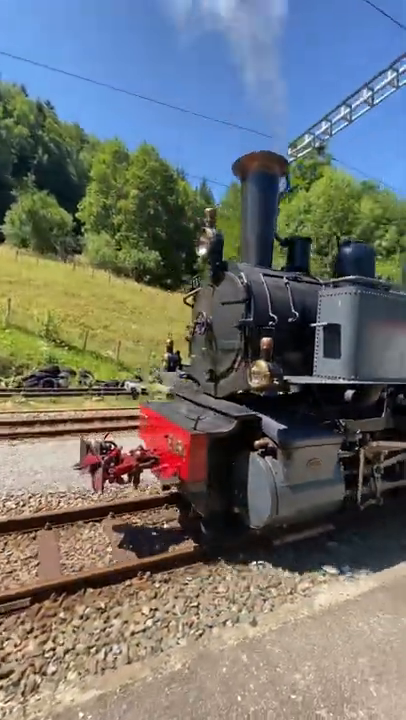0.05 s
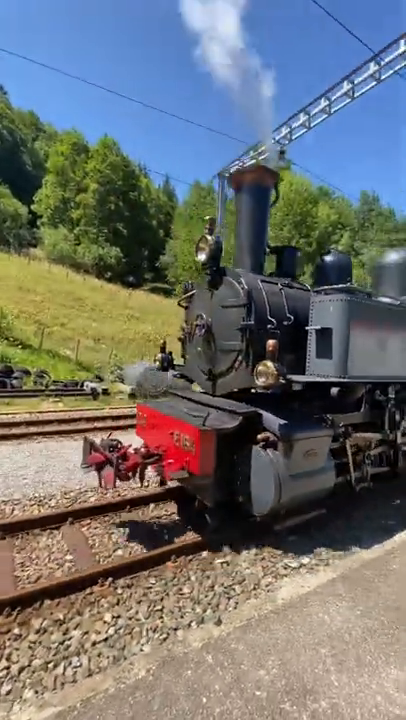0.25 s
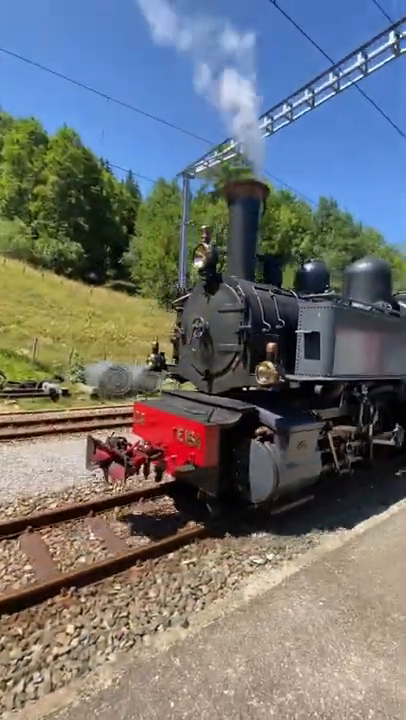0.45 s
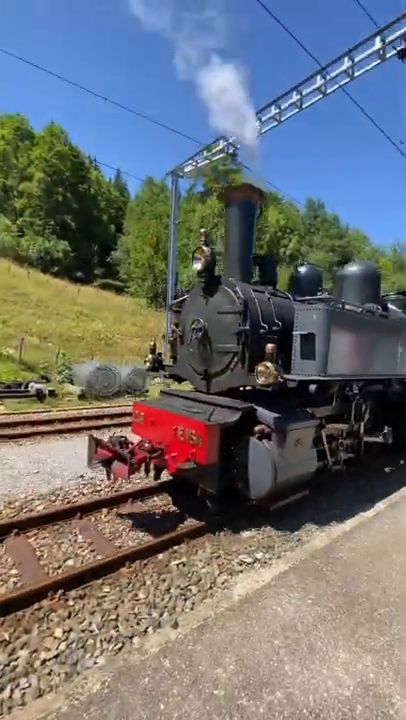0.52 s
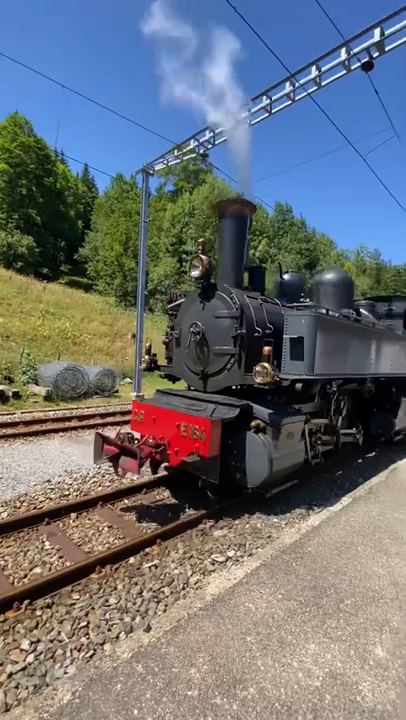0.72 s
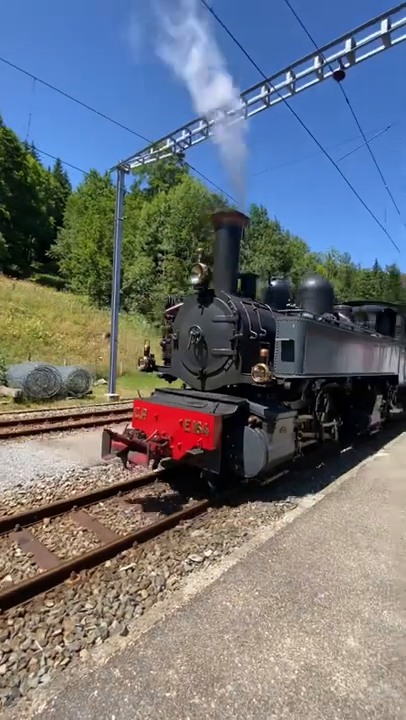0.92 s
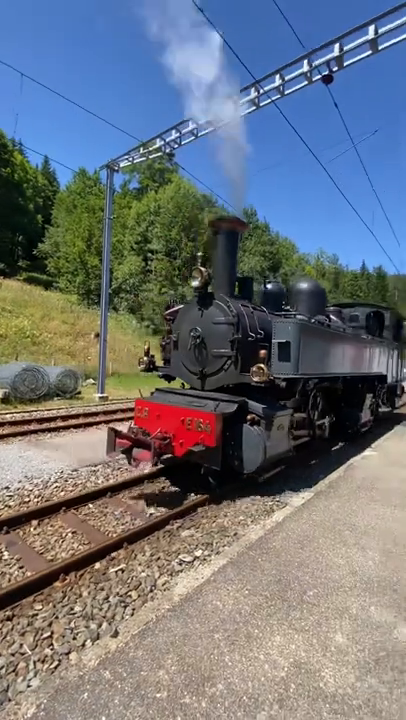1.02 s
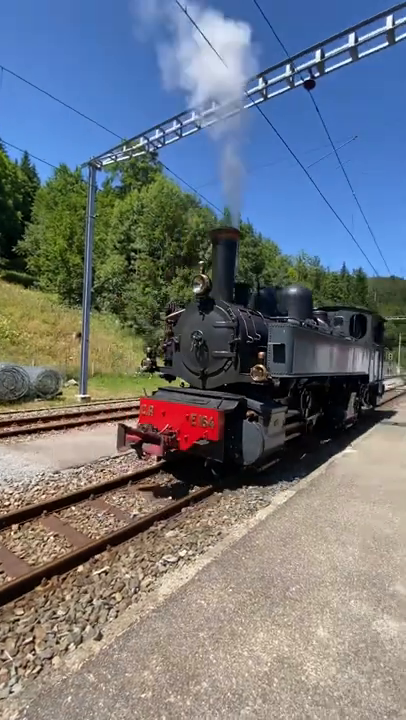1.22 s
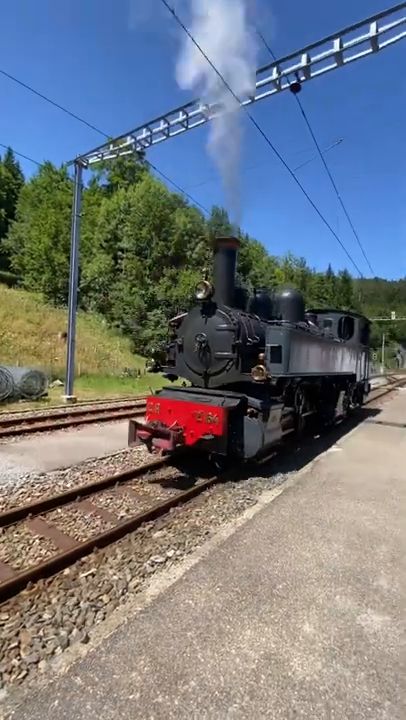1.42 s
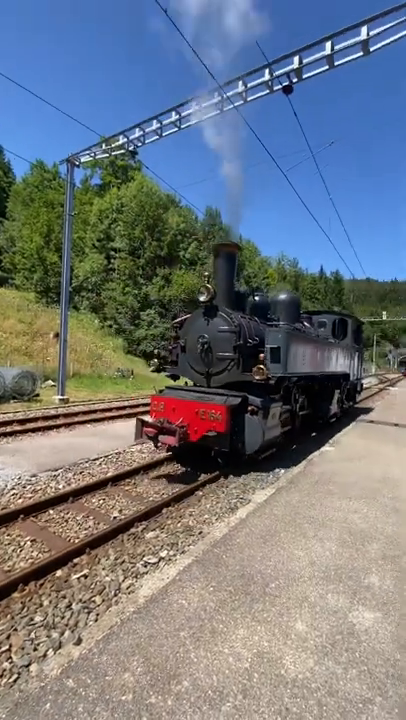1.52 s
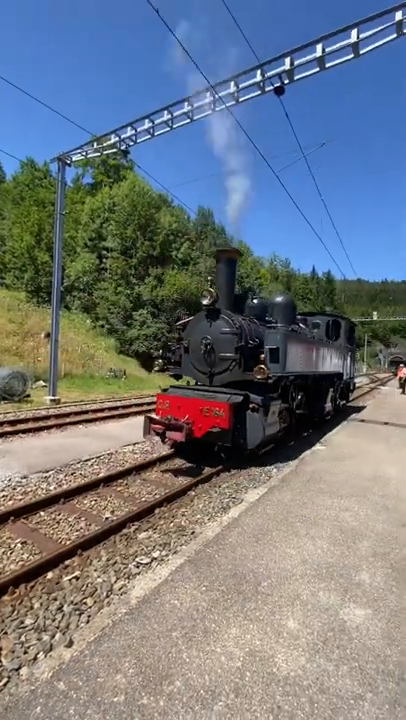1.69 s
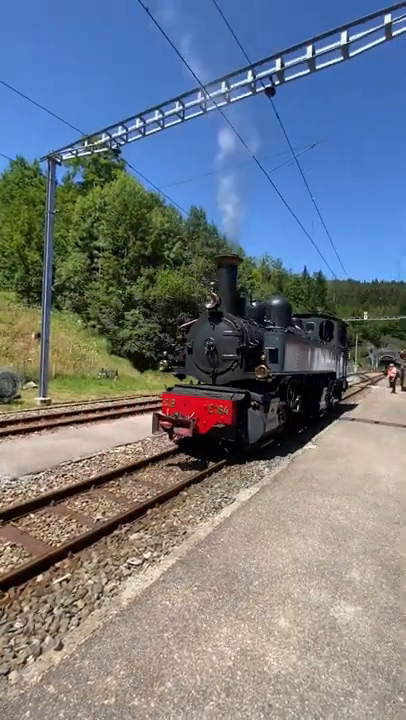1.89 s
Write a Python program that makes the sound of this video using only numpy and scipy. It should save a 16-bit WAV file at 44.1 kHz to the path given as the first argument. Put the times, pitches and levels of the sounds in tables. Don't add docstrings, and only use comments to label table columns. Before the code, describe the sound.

Steam locomotive hissing steadily with a wavering whistle-like ring, then a sharp double puff of steam

```python
import sys
import numpy as np
from scipy import signal
from scipy.fft import rfft, irfft, next_fast_len
from scipy.io import wavfile
from scipy.ndimage import uniform_filter1d

SR = 44100
rng = np.random.default_rng(int(sys.argv[2]) if len(sys.argv) > 2 else 0)


def field_ratio(decibels):
    return 10 ** (np.asarray(decibels, dtype=float) / 20)


def generate_wav(sig):
    pcm = np.round(np.clip(np.atleast_2d(sig).T, -1, 1) * 32767).astype(np.int16)
    wavfile.write(sys.argv[1], SR, pcm)


N = 85995
T = np.arange(N) / SR


def evened(x):
    return x / np.sqrt(np.mean(x ** 2) + 1e-20)


def read(points, hz):
    f, value = np.transpose(points)
    return np.interp(np.log(hz + 1), np.log(f + 1), value)


def follow(rows, column):
    rows = np.array(rows)
    return np.interp(T, rows[:, 0], rows[:, column])


def drift(size):
    once = uniform_filter1d(rng.standard_normal(N), size)
    return evened(uniform_filter1d(once, size))


def bump(centre_s, length_s):
    return np.cos(np.pi / 2 * np.clip((T - centre_s) / length_s, -1, 1)) ** 2


def resonate(x, hz, width_hz):
    turn = np.exp(2j * np.pi * np.cumsum(hz + 0 * T) / SR)
    r = np.exp(-np.pi * width_hz / SR)
    once = signal.lfilter([1 - r], [1, -r], x / turn)
    twice = signal.lfilter([1 - r], [1, -r], once)
    return 2 * (turn * twice).real


def turbulence(colour, patchy_db, flicker_db):
    frames, hz = N // 128 + 6, np.fft.rfftfreq(512, 1 / SR)
    a, b, c, d, p = rng.standard_normal((frames, 257, 5)).T
    patches = evened(uniform_filter1d(uniform_filter1d(p, 6, 0), 20, 1))
    flicker = evened(uniform_filter1d(p.sum(0), 12))
    level_db = read(colour, hz)[:, None] + patchy_db * patches + flicker_db * flicker
    z = np.array([a + 1j * b, c + 1j * d]) * field_ratio(level_db)
    return evened(signal.istft(z, nperseg=512, noverlap=384)[1][:, :N])


def ringing(modes, surge_db):
    white, out = rng.standard_normal((2, N)), 0
    for hz, width_hz, db in modes:
        gain = field_ratio(db + surge_db * drift(size=900))
        moving_hz = hz * (1 + 0.0063 * drift(size=4000))
        out = out + gain * evened(resonate(white, moving_hz, width_hz))
    return out


def tone(hz):
    wobble_hz, flutter_db = 7, 1.0
    turns = np.cumsum(hz + wobble_hz * drift(size=300)) / SR
    lag_turns = np.array([0 * T, -.45 + .06 * drift(size=1500)])
    return np.sqrt(2) * np.cos(2 * np.pi * (turns + lag_turns)) * field_ratio(flutter_db * drift(size=350))


def bursts(rows, spread):
    white, out = rng.standard_normal((2, N)), 0
    for centre_s, length_s, db, hz in rows:
        shape = bump(centre_s, length_s)
        gust = shape * resonate(white, hz, spread * hz)
        out = out + field_ratio(db) * gust * np.sqrt((shape ** 2).sum() / (gust ** 2).sum(1, keepdims=True))
    return out


def leak():
    # time [s], hiss [dB], cavity breath [dB], pipe ring re hiss [dB].
    leak_levels = [
        (0, -39.5, -37.5, 0),
        (.12, -35, -39, -1),
        (.3, -35, -38, 2.5),
        (.55, -35.5, -36, 3),
        (.8, -35, -36.5, 3.5),
        (1., -36.5, -33.5, 3),
        (1.2, -44.5, -42, 3.5),
        (1.45, -38, -38, -3.5),
        (1.7, -39, -43.5, -1.5),
        (1.95, -40.5, -55, -2.5),
    ]
    # frequency [Hz], density [dB per Hz].
    hiss_colour = [(400, -34.5), (900, -2), (1500, -5), (3400, -9), (5600, -7), (9000, -10.5), (12500, -12),
                   (15500, -14.5)]
    # frequency [Hz], width [Hz], level [dB].
    pipe_modes = [(1924, 60, -16.5), (1997, 81, -11.5), (2703, 64, -13.5), (3350, 96, -17), (3977, 67, -11),
                  (4089, 72, -11.5), (5000, 40, -23), (5650, 100, -18), (6150, 50, -16), (6600, 110, -21),
                  (7520, 44, -7), (7800, 2040, -5), (12030, 2700, -5)]
    # centre [s], length [s], level [dB], pitch [Hz].
    lock_swells = [(0.106, 0.034, -36.5, 1156), (0.162, 0.031, -37, 1140), (0.254, 0.032, -30, 1124),
                   (0.289, 0.035, -31.5, 1126), (0.329, 0.023, -25, 1128), (0.417, 0.024, -26.5, 1138),
                   (0.456, 0.028, -29.5, 1130), (0.485, 0.026, -28.5, 1160), (.52, .035, -35, 1160),
                   (0.581, 0.031, -33, 1120), (0.644, 0.015, -27, 1123), (0.674, 0.026, -28, 1130),
                   (.695, 0.0096, -28.5, 1135), (0.772, 0.034, -26, 1124), (0.814, .022, -24.5, 1126),
                   (.858, 0.05, -21, 1126), (.898, 0.012, -29.5, 1135), (0.918, 0.017, -27.5, 1180),
                   (0.944, 0.017, -24, 1145), (0.999, 0.026, -37, 1120), (1.442, 0.025, -34, 1140),
                   (1.472, 0.027, -38, 1161), (1.505, 0.019, -34, 1165), (1.554, 0.018, -36, 1129),
                   (1.58, 0.027, -39, 1120), (1.607, 0.019, -36.5, 1106), (1.701, 0.013, -39.5, 1121),
                   (1.778, 0.024, -40, 1110), (1.923, 0.017, -41, 1141)]
    cavity_hz, cavity_width_hz = 1133, 24

    pipes = field_ratio(follow(leak_levels, column=3)) * ringing(pipe_modes, surge_db=0.92)
    hiss = turbulence(hiss_colour, patchy_db=3.0, flicker_db=0.67) + pipes
    breath = ringing([(cavity_hz, cavity_width_hz * 3, -5), (cavity_hz * 1.003, 210, -9)], surge_db=2.6)
    shapes = np.array([field_ratio(db) * bump(s, length_s) for s, length_s, db, _ in lock_swells])
    locked = shapes.sum(0)
    hz = (np.array(lock_swells)[:, 3] @ shapes + 1e-4 * cavity_hz) / (locked + 1e-4)
    out = field_ratio(follow(leak_levels, column=1)) * hiss
    out = out + field_ratio(follow(leak_levels, column=2)) * breath
    return out + locked * tone(hz)


def fire():
    # frequency [Hz], level [dB].
    rumble_colour = [(15, -45), (30, -10.5), (65, 2), (172, -3), (269, -0.5), (378, -3.5), (500, -10.5),
                     (712, -4), (1000, -16.5), (1300, -31), (2200, -120)]
    # time [s], level [dB].
    rumble_level = [
        (0, -42),
        (.6, -41),
        (1.201, -43),
        (1.95, -44.5),
    ]
    white = rfft(rng.standard_normal((2, N)))
    hz = np.fft.rfftfreq(N, 1 / SR)
    colour_db = read(rumble_colour, hz)
    colour_db = colour_db - 2.7 * np.maximum(np.log2((hz + 1) / 900), 0)
    colour_db = colour_db - 45 * np.maximum(np.log2(36 / (hz + 1)), 0)
    level_db = follow(rumble_level, column=1) + 0.4 * drift(size=1200)
    return field_ratio(level_db) * evened(irfft(white * field_ratio(colour_db), N))


def pump():
    # centre [s], length [s], level [dB], pitch [Hz].
    chugs = [(0.05, 0.071, -42.5, 750), (.22, 0.097, -39.5, 910), (.245, 0.088, -45.5, 725),
             (0.408, 0.038, -39.5, 880), (0.577, 0.034, -47, 720), (0.781, 0.017, -35.5, 815),
             (0.838, 0.05, -41, 710), (1, 0.032, -60, 760), (1.434, 0.026, -43, 758),
             (1.57, 0.027, -40.5, 885.4), (1.655, 0.048, -38.5, 865), (.27, .08, -44, 102),
             (1.065, 0.035, -47, 66), (1.22, 0.035, -36.5, 262), (1.23, 0.031, -52, 87)]
    # centre [s], length [s], level [dB], pitch [Hz].
    gurgles = [(.24, 0.051, -39, 687), (.84, .03, -45, 724), (1.44, .02, -48, 697), (1.528, .018, -44, 708),
               (1.567, .02, -43, 834), (1.565, 0.022, -35.5, 953), (1.63, 0.041, -47, 227.5),
               (1.652, 0.037, -48, 826), (1.645, .018, -43, 1000), (1.67, 0.042, -48, 658),
               (1.684, .016, -40.5, 238), (1.715, 0.042, -44, 381.5), (1.8, 0.065, -46, 200),
               (1.9, 0.052, -48.5, 433)]
    return bursts(chugs, spread=0.47) + bursts(gurgles, spread=0.052)


def valve():
    # time [s], jet [dB], cavity tone [dB], cavity pitch [Hz].
    first_puff = [
        (1.03, -37.5, -32, 1203),
        (1.048, -21, -12.5, 1298),
        (1.057, -16.5, -13.5, 1221),
        (1.074, -20.5, -15, 1143),
        (1.094, -21, -13, 1145),
        (1.114, -22, -26, 1129),
        (1.128, -24.5, -24.5, 1126),
        (1.15, -30, -43, 1188),
        (1.172, -40.5, -50, 1177),
    ]
    second_puff = [
        (1.175, -35.5, -56, 1201),
        (1.199, -26, -31, 1174),
        (1.222, -27, -21.5, 1141),
        (1.243, -25.5, -38, 1115),
        (1.258, -24.5, -25, 1126),
        (1.28, -29.5, -47, 1104),
        (1.306, -28.5, -24, 1077),
        (1.341, -34.5, -39.5, 1075),
        (1.491, -41, -64, 1055),
    ]
    # frequency [Hz], density [dB per Hz].
    jet_colour = [(150, -11), (300, -9.5), (600, -4), (1500, -4.5), (3500, -3.5), (7000, -7), (8500, -9),
                  (15500, -28)]
    # frequency [Hz], width [Hz], level [dB].
    nozzle_modes = [(1217, 310, -2.5), (1818, 170, -7), (2752, 170, -4), (3273, 55, -8), (4256, 96, -12.5),
                    (5194, 400, -8.5), (6195, 140, -13)]
    # centre [s], length [s], level [dB], pitch [Hz].
    cracks = [
        (1.046, 0.016, -26, 2190),
        (1.062, 0.018, -30.5, 1950),
        (1.06, 0.02, -21.5, 5320),
        (1.052, .014, -27, 6400),
        (0.98, 0.007, -37, 2600),
        (0.98, 0.016, -29, 3450),
        (1.1, 0.012, -28.5, 9300),
        (1.056, 0.0095, -32.5, 10400),
        (1.056, 0.012, -33, 11400),
    ]
    rows = first_puff + second_puff
    start_s, end_s = rows[0][0], rows[-1][0]
    opened = np.clip((T - start_s) / 0.0045, 0, 1) * np.clip((end_s - T) * 20, 0, 1)
    nozzle = field_ratio(-3.5) * ringing(nozzle_modes, surge_db=2.1)
    jet = evened(turbulence(jet_colour, patchy_db=0.5, flicker_db=-0.5) + nozzle)
    hz = follow(rows, column=3)
    song = tone(hz) + field_ratio(-22) * tone(2.8 * hz)
    puffs = field_ratio(follow(rows, column=1)) * jet + field_ratio(follow(rows, column=2)) * song
    return opened * puffs + bursts(cracks, spread=0.099)


def scene():
    return leak() + fire() + pump() + valve()


def ports(dry):
    # frequency [Hz], likeness [0-1].
    same_low = [(330, 1), (550, 0.54), (750, 0.47), (1130, 0.96), (1500, 0.11), (2000, 0.62), (3300, 0.5),
                (5400, 0.48)]
    same_high = [(6600, .65), (8000, .99), (9000, .65), (9800, .99), (11000, .98), (12200, .8),
                 (12900, .94), (15000, .88)]
    # frequency [Hz], lead [rad].
    lead_low = [(0, 0), (250, .28), (400, 1.45), (550, 3.9), (1130, 11.4), (2100, 12.3), (2700, 9.6),
                (3700, 9.4)]
    lead_high = [(5300, 12.5), (7700, 9.6), (8300, 9.2), (9800, 6.4), (10900, 6.2), (12700, 3.2),
                 (14900, 3.1), (15400, 0)]
    # frequency [Hz], left over right [dB].
    balance = [(250, 0.5), (400, 4), (550, -6.5), (800, 0.5), (1130, 5.5), (1500, -0.5), (2000, -2.5),
               (3000, -1)]
    # start [s], end [s].
    top_gaps = [
        (.015, .045),
        (1.055, 1.125),
        (1.245, 1.47),
        (1.59, 1.63),
        (1.73, 1.775),
    ]
    edge_hz, top_hz = 15700, 14900
    far_s, far_hz, far_width_hz, far_share = 1.48, 8000, 900, .6

    size = next_fast_len(N + 4096)
    hz = np.fft.rfftfreq(size, 1 / SR)
    direct, scattered = rfft(dry, size) * (hz < edge_hz)
    same = np.clip(read(same_low + same_high, hz), 0, 1)
    lead_rad = np.interp(hz, *np.transpose(lead_low + lead_high))
    tilt = field_ratio(read(balance, hz) / 2)
    right = same * direct * np.exp(1j * lead_rad) + np.sqrt(1 - same ** 2) * scattered
    x = irfft([direct * tilt, right / tilt], size)[:, :N]
    far = np.clip((T - far_s) * 20, 0, 1) * resonate(dry[1], far_hz, far_width_hz)
    x = x + far_share * far * [[0], [1]]
    gaps = sum((T > start_s) * (T < end_s) * 1. for start_s, end_s in top_gaps)
    top = irfft(rfft(x, size) * (hz > top_hz), size)[:, :N]
    return x - uniform_filter1d(gaps, size=300) * top


def gain_control(x):
    power = uniform_filter1d((x ** 2).mean(0), 400)
    power_db = 10 * np.log10(abs(power) + 1e-12)
    fall_db = T * 60.
    held_db = np.maximum.accumulate(power_db + fall_db) - fall_db
    over_db = np.maximum(held_db + 18.5, 0)
    return x * field_ratio(3.5 - 0.3 * uniform_filter1d(over_db, 300))


def top_cut(x):
    return signal.sosfilt(signal.butter(12, 16920, fs=SR, output="sos"), x)


def record(dry):
    mix = gain_control(ports(dry))
    return top_cut(mix)


dry = scene()
out = record(dry)
generate_wav(out)
```